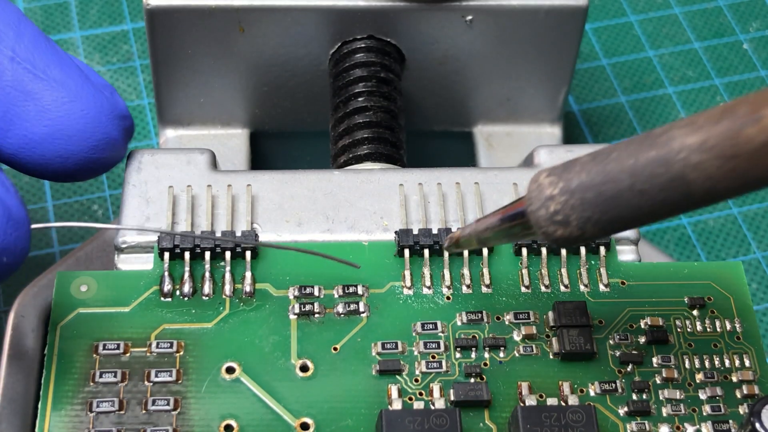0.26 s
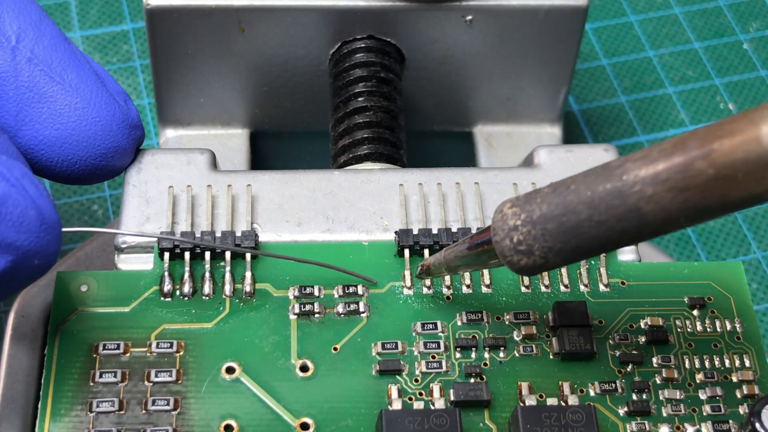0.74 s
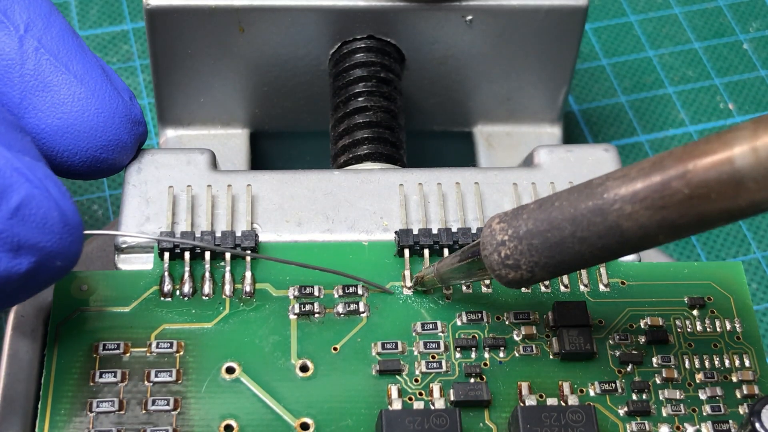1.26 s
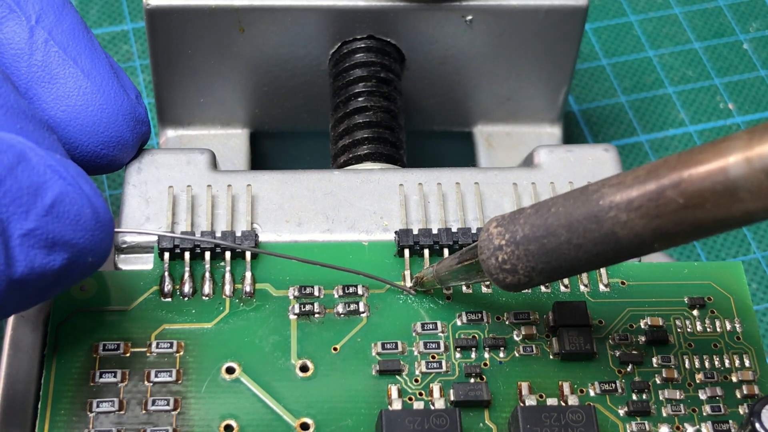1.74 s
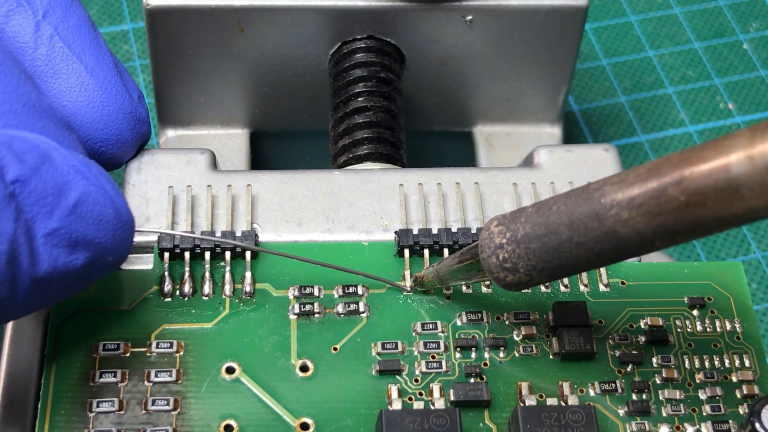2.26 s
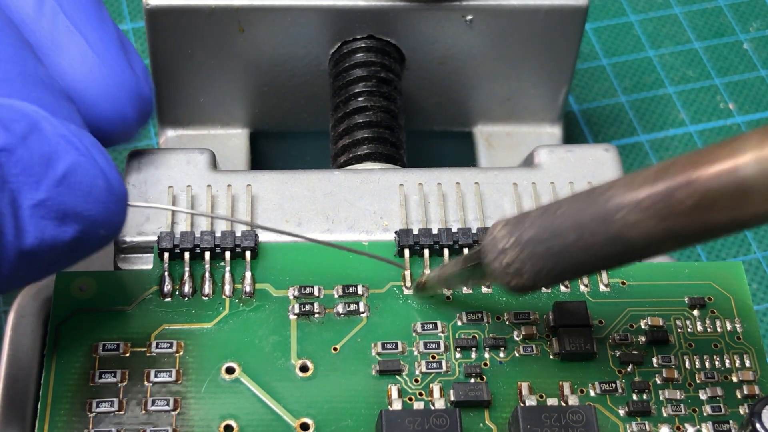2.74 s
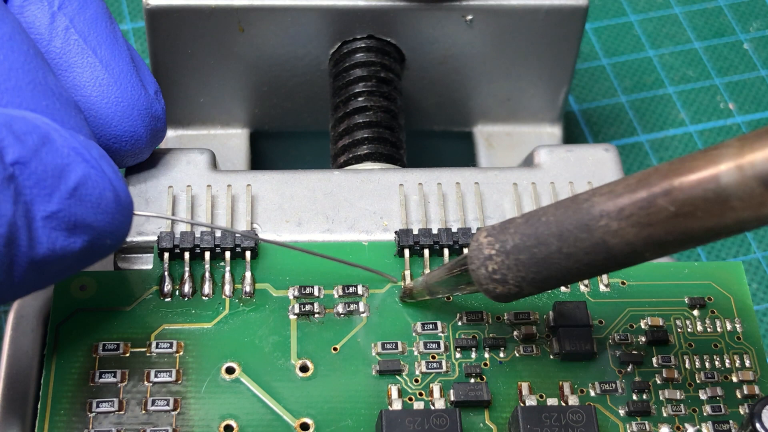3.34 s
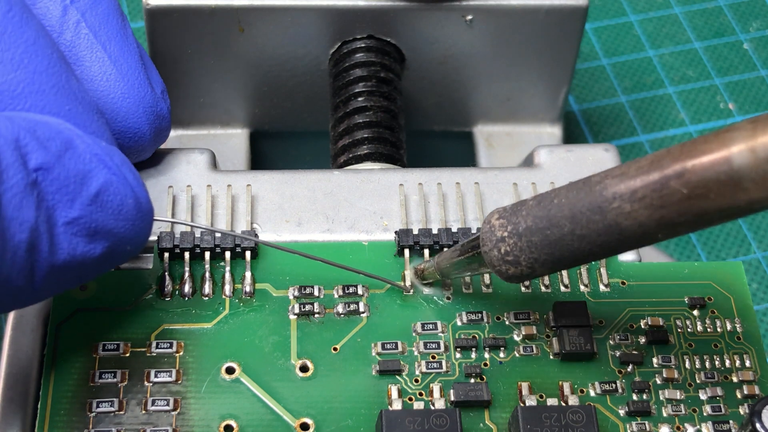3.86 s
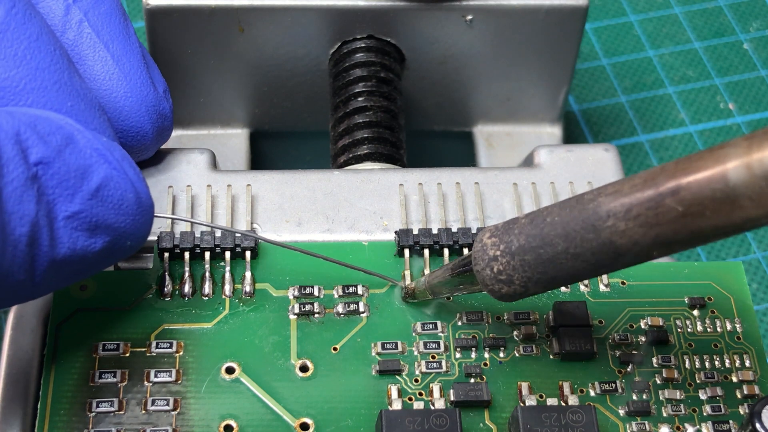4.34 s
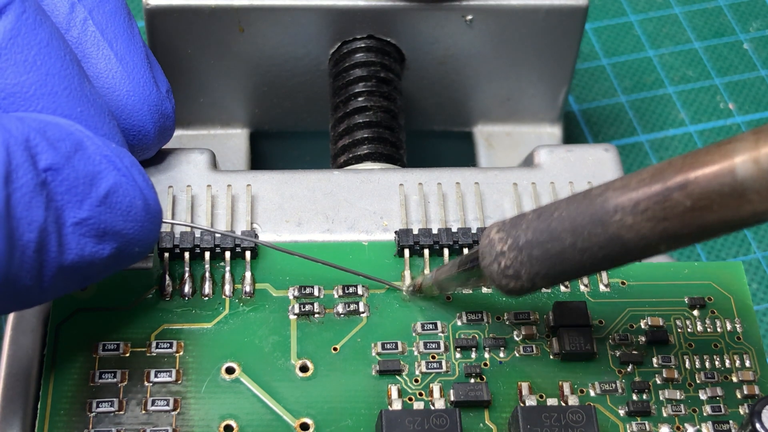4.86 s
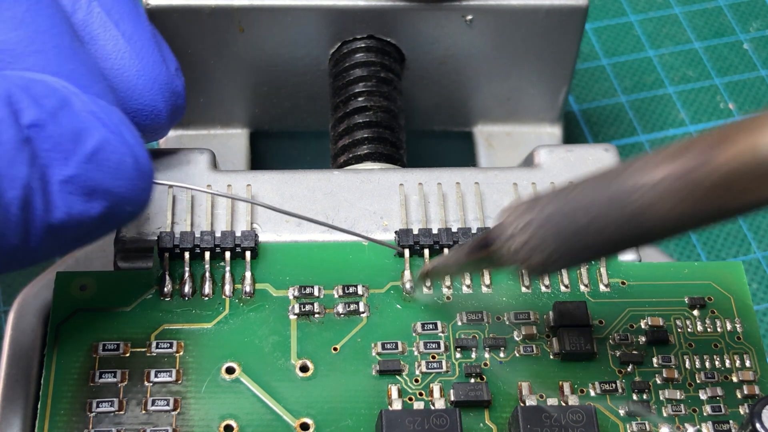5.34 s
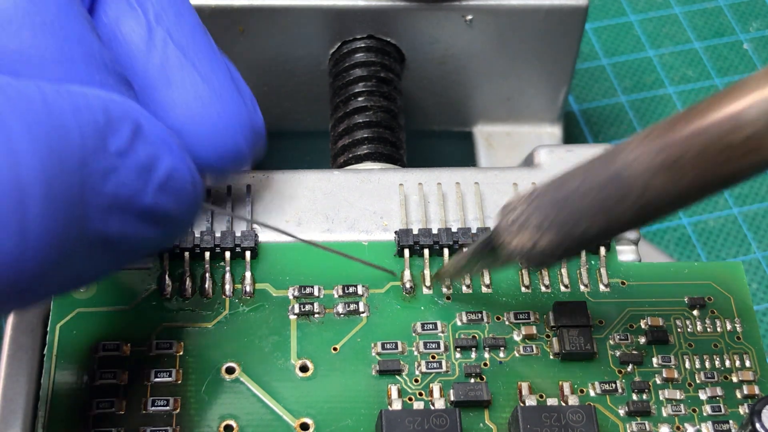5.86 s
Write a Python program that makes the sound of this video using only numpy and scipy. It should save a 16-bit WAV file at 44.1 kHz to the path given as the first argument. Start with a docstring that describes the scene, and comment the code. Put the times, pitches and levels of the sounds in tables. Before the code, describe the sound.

A soldering iron taps and scrapes metal pins on a circuit board while flux faintly sizzles and crackles over a low room rumble.

```python
"""A soldering iron works on the pins of a circuit board held in a small vise, close by.
A low room rumble and a thin electrical whine run throughout; a faint squeak soon joins, every 2 s.
After a second the tip taps a pin and slips off, making pins, board and vise ring. Flux (the paste
that helps solder flow) sizzles and spits as the solder melts. From about 3 s the hot joint crackles,
and the tip then also scrapes over the pins. A few last taps come near 6 s."""
import sys
import numpy as np
from scipy import signal
from scipy.fft import rfft, irfft
from scipy.io import wavfile
from scipy.ndimage import uniform_filter1d

SR = 44100
rng = np.random.default_rng(int(sys.argv[2]) if len(sys.argv) > 2 else 0)


def wrap_up_sound(samples):
    """Save the sound to the file named by the first command line argument, as 16-bit audio."""
    columns = np.atleast_2d(samples).T
    # keep every value between -1 and 1, then stretch to whole-number steps
    tamed = np.clip(columns, -1, 1)
    steps = np.round(tamed * 32767).astype(np.int16)
    wavfile.write(sys.argv[1], SR, steps)


N = 269010
TIME = np.arange(N) / SR
RING_TIME = TIME[:SR // 2]  # half a second, for one short sound

# tone colour of the room's rumble and hiss: f/Hz, level/dB
ROOM_COLOUR = [(8.8, -22), (15, 1), (54, -10), (126, -19.5), (269, -28.5), (312, -30), (512, -35),
               (972, -42.5), (1160, -45.5), (1510, -48.5), (1690, -48), (3030, -51.5), (3720, -52),
               (13800, -55.5), (16000, -58.5)]
# tones of the electrical whine: f/Hz, level/dB
WHINE_TONES = [(1001, -81.5), (1491, -83.5), (2977, -87.5), (3989, -95)]
# one squeak per row: level/dB, length/s
SQUEAK_TURNS = [(-63.5, 0.077), (-60.5, 0.056), (-54, 0.035)]
# the two tones in each squeak: f/Hz, level/dB
SQUEAK_PAIR = [(1452, -0.5), (1590, -6)]
# tone colour of the echo from the walls: f/Hz, level/dB
ECHO_COLOUR = [(80, 6.5), (300, 0.5), (1200, -4), (4000, -5), (16000, -6)]
# tones that board and vise ring at: f/Hz, tap level/dB, slip level/dB, t60/s (time to fade by 60 dB)
BOARD_TONES = [(143.3, 4.5, -1.5, 0.18), (194.7, -3, -12.5, 0.42), (296.6, -8, 14, 0.18),
               (325, 1, -6, 0.17), (394.5, 9.5, -16, 0.057), (421.7, 8.5, 12.5, 0.058),
               (682, -13.5, 13.5, 0.071), (694.3, -4.5, 10.5, 0.099), (718, -3.5, -14, 0.077),
               (762, -6, -13, 0.19), (845, 3, -6, 0.048), (954, -3.5, -24, 0.21), (994, -4, -38, .12),
               (1168, -15, -8, 0.2), (1090, -23, -7, 0.031), (1445, -36, -29, 0.097),
               (1677, -18, -12, 0.29), (1960, -14.5, 1, 0.14), (2195, -14, -19.5, 0.2),
               (2464, -16, -7, 0.17)]
# tones that pins and tip ring at: f/Hz, tap level/dB, slip level/dB, t60/s
PIN_TONES = [(2475, 3, 7, 0.028), (2850, -7.5, -21, 0.038), (3830, -1.5, -24, 0.054),
             (4540, -11, 15, 0.044), (4690, 3, 2.5, 0.047), (4910, -2.5, 10, .06), (5250, -10, 15.5, 0.03),
             (5630, -4, 2, 0.054), (6100, -9, 4.5, 0.04), (6190, 2.5, -12, 0.044), (6600, -8, 0, 0.057),
             (7670, -14, -14, 0.056), (8770, -13, -10, 0.046), (8930, -4, -21, 0.04)]
# tone colour of the rattling fittings: f/Hz, level/dB
RATTLE_COLOUR = [(200, -14), (450, -2), (570, -27), (800, 4.5), (1250, 21), (1450, -14), (2500, 1),
                 (3200, -26), (5000, -34)]
# tone colour of metal hitting metal: f/Hz, level/dB
CRACK_COLOUR = [(1200, 13.5), (2300, 5.5), (3300, 1), (4800, 7), (6300, -30), (7200, 1), (10000, -5.5),
                (12500, -14), (14000, -31), (16000, -40)]
# the tip lands on a pin: t/s, board level/dB, hardness/dB (metal above board), slip share (0 to 1)
TIP_TAPS = [(1.1036, -38, -11.5, 0.17), (1.111, -47.5, -10, 0.34), (3.226, -41, -17.5, 0.05),
            (3.341, -53.5, -9.5, 0.2), (3.4996, -36, -17, .15), (4.205, -37.5, -22.5, 0),
            (4.8291, -40.5, -16.5, .3), (5.94, -32, -15, .1), (6.0551, -38, -17.5, 0.2),
            (6.069, -48.5, -15.5, .2)]
# the tip slips off: t/s, board level/dB, lift of its upper tones/dB, metal level/dB, board cutoff/Hz
TIP_SLIPS = [(1.119, -41, 9.5, -38, 603), (1.219, -51, -5, -75, 1000), (3.832, -49, 3, -65, 1210),
             (3.8518, -41.5, -9, -46.5, 4000), (4.5703, -42, -20, -50, 2500),
             (4.5761, -34, -2.5, -58, 1860), (4.673, -46, 0.5, -79, 900)]
# fresh flux meets the tip and boils: start/s, length/s, level/dB
FLUX_BOILS = [(1.16, 0.058, -69.5), (1.755, 0.047, -68.5), (1.857, 0.21, -73), (2.474, 0.23, -74),
              (3.23, 0.063, -66.5), (3.355, 0.024, -62.5), (3.424, 0.028, -73), (3.85, 0.062, -63.5),
              (3.986, 0.07, -63)]
# tone colour of bursting flux bubbles: f/Hz, level/dB
BUBBLE_COLOUR = [(1500, -12), (3000, -9.5), (5500, -0.5), (7000, -8.5), (8200, 3), (10000, -1.5),
                 (11800, 1), (13000, -14), (16000, -13.5)]
# tone colour of the small spits in a boil: f/Hz, level/dB
SPRAY_COLOUR = [(2000, -16), (5000, -4), (9000, 1), (13000, 0), (16000, -8)]
# the loudest spits of flux: t/s, level/dB
LOUD_SPITS = [(1.810, -70), (2.329, -69), (2.343, -70), (2.371, -68.5), (2.51, -66), (3.202, -70),
              (3.775, -68.5), (3.802, -70.5), (4.066, -68), (4.356, -68.5), (4.40, -68)]
# tone colour of the hot joint's crackle: f/Hz, level/dB
CRACKLE_COLOUR = [(1500, 0), (3500, -11.5), (5800, -3), (9500, -8), (12500, -17), (16000, -36)]
# the tip drags over a pin: start/s, end/s, board level/dB, metal level/dB
TIP_SCRAPES = [(3.769, 3.872, -59, -67), (3.87, 3.94, -58, -78), (4.05, 4.11, -57, -79),
               (4.516, 4.543, -47.5, -52), (4.54, 4.574, -46, -58), (5.392, 5.51, -65.5, -72)]


def gain(db):
    """Turn decibels into a number to multiply by."""
    return 10 ** (np.asarray(db) / 20)


def unit(x):
    """Scale to an average strength (rms) of 1."""
    return x / np.sqrt(np.mean(x ** 2))


def unit_hit(x):
    """Scale a hit so that its first 25 ms have an average strength of 1."""
    return x / np.sqrt(np.mean(x[:SR // 40] ** 2))


def fade(t60):
    """A curve that falls by 60 dB every t60 seconds."""
    return np.exp(-np.log(1000) * RING_TIME / t60)


def add(out, start, x):
    """Mix x into out, beginning at start seconds."""
    i = int(start * SR)
    out[i:i + len(x)] += x[:N - i]


def colour(x, points):
    """Make each frequency louder or softer, following a tone colour table."""
    hz, db = np.transpose(points)
    f = np.maximum(np.fft.rfftfreq(len(x), 1 / SR), 1)
    return irfft(rfft(x) * gain(np.interp(np.log(f), np.log(hz), db)), len(x))


def noise(points, size=len(RING_TIME)):
    """Noise of strength 1 with the given tone colour."""
    return unit(colour(rng.standard_normal(size), points))


def wobble(size, rate):
    """A random curve that changes about rate times a second."""
    return unit(uniform_filter1d(rng.standard_normal(size), SR // rate))


def clicks(size, rate, spread_db):
    """Random clicks of uneven strength, about rate of them a second."""
    strength = gain(spread_db * np.minimum(rng.exponential(size=size), 3))
    fires = rng.random(size) < rate / SR
    return unit(fires * strength * rng.choice([-1, 1], size) + 1e-9)


def excite(force, ring):
    """Let every push in force start its own copy of a ring."""
    return signal.fftconvolve(force, ring / np.linalg.norm(ring))


def room_rumble(level_db=-45.5):
    """The room's steady low rumble, with a little hiss on top."""
    return gain(level_db) * noise(ROOM_COLOUR, N)


def whine(waver=0.00294):
    """A thin electrical whine whose tones waver together in pitch."""
    clock = np.cumsum(1 + waver * wobble(N, rate=20)) / SR
    return sum(gain(db) * np.sqrt(2) * np.sin(2 * np.pi * (hz * clock + rng.random()))
               for hz, db in WHINE_TONES)


def squeaks(first_s=0.414, every_s=2.018, waver=0.022, tail_db=-5, tail_t60=0.61):
    """Something far off squeaks briefly, with an unsteady pitch and a soft tail."""
    out = np.zeros(N)
    for turn, (db, length) in enumerate(SQUEAK_TURNS):
        progress = np.minimum(RING_TIME / length, 1)
        swell = np.sin(np.pi * progress) + gain(tail_db) * progress * fade(tail_t60)
        for hz, tone_db in SQUEAK_PAIR:
            pitch = hz * (1 + waver * wobble(len(RING_TIME), rate=300))
            tone = np.sin(2 * np.pi * np.cumsum(pitch) / SR)
            add(out, first_s + turn * every_s, gain(db + tone_db) * swell * tone)
    return out


def wall_echo(direct, level_db=-16, t60=0.25, delay_s=0.004):
    """The walls of a small room throw the sound back as a short, blurred echo."""
    reflections = noise(ECHO_COLOUR) * fade(t60) * (RING_TIME > delay_s)
    return gain(level_db) * excite(direct, reflections)[:N]


def ringing_tones(table, slip, damping, scatter_db=3, detune=0.0022):
    """Give (Hz, wave) pairs. A slip favours other tones than a tap; a pressed tip shortens them."""
    for hz, tap_db, slip_db, t60 in table:
        db = tap_db + slip * (slip_db - tap_db) + scatter_db * rng.normal()
        cycles = hz * (1 + detune * rng.normal()) * RING_TIME
        cycles += min((hz / 1800) ** 2, 1) * rng.random()  # high tones arrive out of step
        yield hz, -gain(db) * fade(t60 / (1 + damping)) * np.sin(2 * np.pi * cycles)


def board_knock(upper_db, slip, cutoff_hz, damping, upper_from_hz=560, rattle_db=-11):
    """Board and vise ring. A softer touch has a lower cutoff, so it sounds duller."""
    tones = ringing_tones(BOARD_TONES, slip, damping)
    ring = sum(gain(upper_db * (hz > upper_from_hz)) * wave for hz, wave in tones)
    # many weak tones of the fittings blur into a short rattle
    rattle = gain(rattle_db) * noise(RATTLE_COLOUR) * fade(t60=0.07)
    # the small board gives off little bass below 130 Hz
    band = signal.butter(2, [130, cutoff_hz], "bandpass", fs=SR, output="sos")
    return unit_hit(signal.sosfilt(band, unit_hit(ring) + rattle))


def pin_tick(slip, treble_db, damping=0.42, crack_db=-2, buzz_db=1):
    """Metal on metal: a short ring, a crack, and a buzz of many tones packed close together."""
    ring = sum(wave for hz, wave in ringing_tones(PIN_TONES, slip, damping))
    crack = unit_hit(noise(CRACK_COLOUR) * fade(t60=0.018))
    buzz = unit_hit(noise(CRACK_COLOUR) * fade(t60=0.052))
    tick = unit_hit(ring) + gain(crack_db) * crack + gain(buzz_db) * buzz
    treble_lift = signal.firwin2(33, [0, 5500, 9000, SR / 2], gain([0, 0, treble_db, treble_db]), fs=SR)
    return unit_hit(signal.lfilter(treble_lift, 1, tick))


def contact(board_db, upper_db, metal_db, cutoff_hz, slip, bright_above_db=-47):
    """One touch of the tip rings both board and pin; the loudest ticks get extra treble."""
    knock = board_knock(upper_db, slip, cutoff_hz, damping=0.2 + 0.49 * slip)
    tick = pin_tick(slip, treble_db=0.84 * max(metal_db - bright_above_db, 0))
    return gain(board_db) * knock + gain(metal_db) * tick


def taps(upper_db=6, hard_cutoff_hz=1850, octaves_per_db=0.03):
    """The tip lands on a pin; the harder the contact, the brighter the board sounds."""
    out = np.zeros(N)
    for start, board_db, hardness_db, slip in TIP_TAPS:
        cutoff_hz = hard_cutoff_hz * 2 ** (octaves_per_db * hardness_db)
        add(out, start, contact(board_db, upper_db, board_db + hardness_db, cutoff_hz, slip))
    return out


def slips():
    """The tip slides off a pin with a snap."""
    out = np.zeros(N)
    for start, board_db, upper_db, metal_db, cutoff_hz in TIP_SLIPS:
        add(out, start, contact(board_db, upper_db, metal_db, cutoff_hz, slip=0.89))
    return out


def boil_strength(length, rise_s=0.018, drop_t60=0.11, simmer_db=-13, simmer_t60=2.6):
    """One boil swells, holds until length seconds are up, then drops to a fading simmer."""
    since_end = np.maximum(TIME - length, 0)
    drop = gain(-60 * since_end / drop_t60)
    simmer = gain(simmer_db - 60 * since_end / simmer_t60)
    return np.minimum(TIME / rise_s, 1) * np.maximum(drop, simmer)


def sizzle(spray_db=-3.5, pop_t60=0.0095):
    """Boiling flux: a swarm of tiny bubbles bursts in quick spurts, with a spray of small spits."""
    power = np.zeros(N)
    for start, length, db in FLUX_BOILS:
        add(power, start, (gain(db) * boil_strength(length)) ** 2)
    spurts = unit(gain(1.6 * wobble(N, rate=200)))
    bubbles = unit(colour(clicks(N, rate=4000, spread_db=4.5), BUBBLE_COLOUR))
    pops = signal.fftconvolve(abs(clicks(N, rate=70, spread_db=3)), fade(pop_t60))[:N]
    spray = unit(pops * noise(SPRAY_COLOUR, N))
    return np.sqrt(power) * (spurts * bubbles + gain(spray_db) * spray)


def spits(pop_t60=0.0095):
    """Single flux bubbles burst, each with a sharp pop."""
    out = np.zeros(N)
    for start, db in LOUD_SPITS:
        add(out, start, gain(db) * unit_hit(noise(BUBBLE_COLOUR) * fade(pop_t60)))
    return out


def crackle(start_s=2.9, rise_s=0.8, level_db=-72.5):
    """Once the joint is hot, scattered bubbles burst with a duller crackle."""
    pops = signal.fftconvolve(abs(clicks(N, rate=80, spread_db=-2)), fade(t60=0.024))[:N]
    heat = np.clip((TIME - start_s) / rise_s, 0, 1)
    return gain(level_db) * heat * unit(pops * noise(CRACKLE_COLOUR, N))


def scrapes():
    """The dragged tip sticks and slips very fast; each tiny jerk rings board and pin."""
    out = np.zeros(N)
    for start, end, board_db, metal_db in TIP_SCRAPES:
        size = int((end - start) * SR)
        jerks = clicks(size, rate=2100, spread_db=-0.5) * signal.windows.tukey(size, 0.5)
        knock = board_knock(upper_db=5.5, slip=0.37, cutoff_hz=3970, damping=3.6, rattle_db=-20)
        tick = pin_tick(slip=0.36, treble_db=9, damping=0.5, crack_db=-0.5)
        add(out, start, gain(board_db) * excite(jerks, knock) + gain(metal_db) * excite(jerks, tick))
    return out


def scene():
    """Mix iron, flux and squeaks with their echo and the background, in one channel."""
    iron = taps() + slips() + scrapes()
    flux = spits() + sizzle() + crackle()
    direct = iron + flux + squeaks()
    return (direct + wall_echo(direct) + whine() + room_rumble())[None]


def record(dry, top_hz=15900):
    """Cut away the very highest treble."""
    return signal.sosfilt(signal.ellip(10, 0.1, 70, top_hz, fs=SR, output="sos"), dry)


dry = scene()
out = record(dry)
wrap_up_sound(out)
```